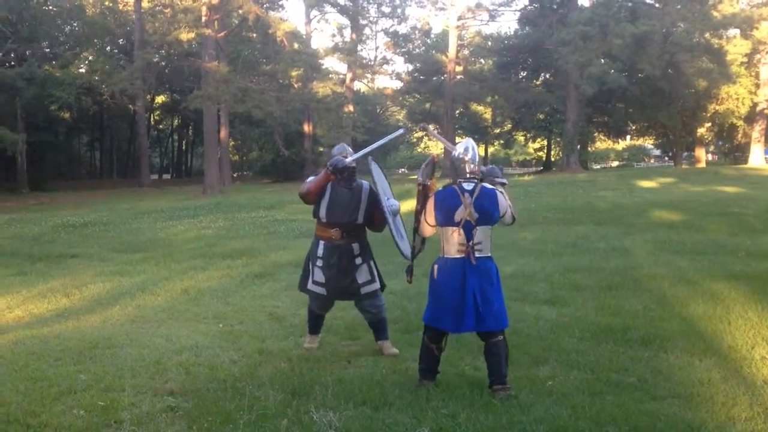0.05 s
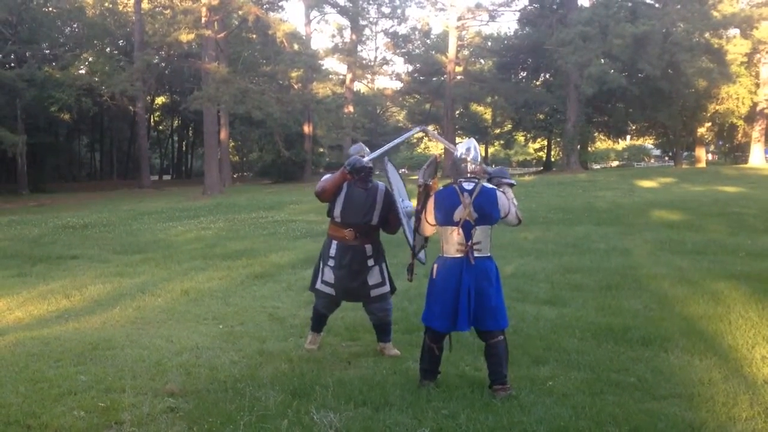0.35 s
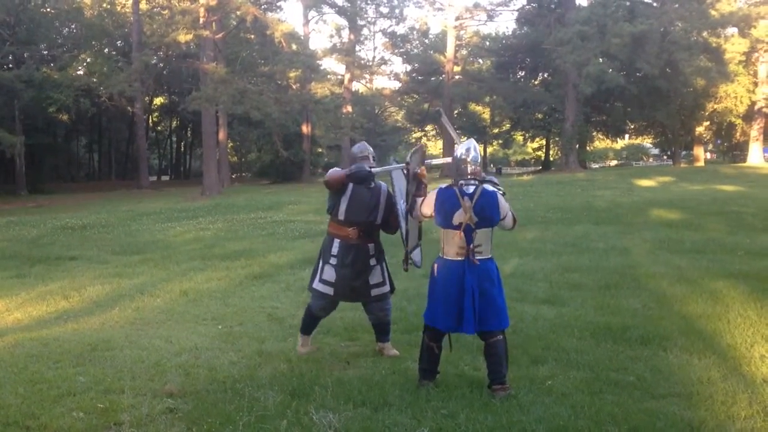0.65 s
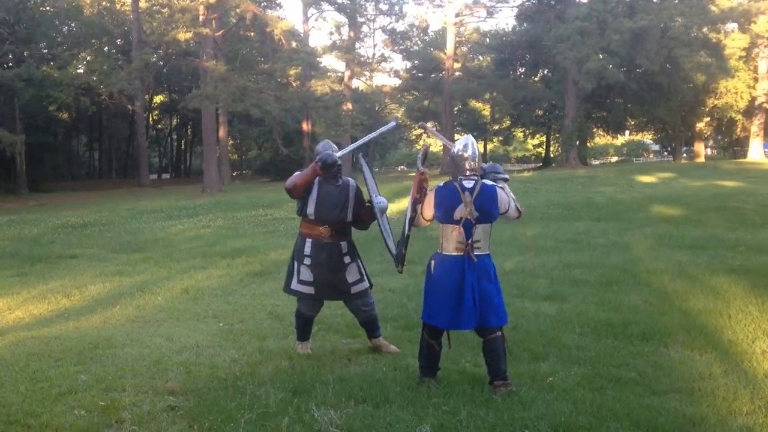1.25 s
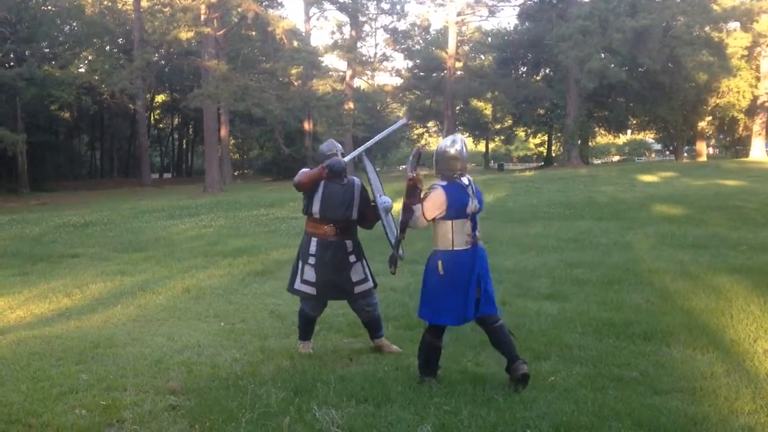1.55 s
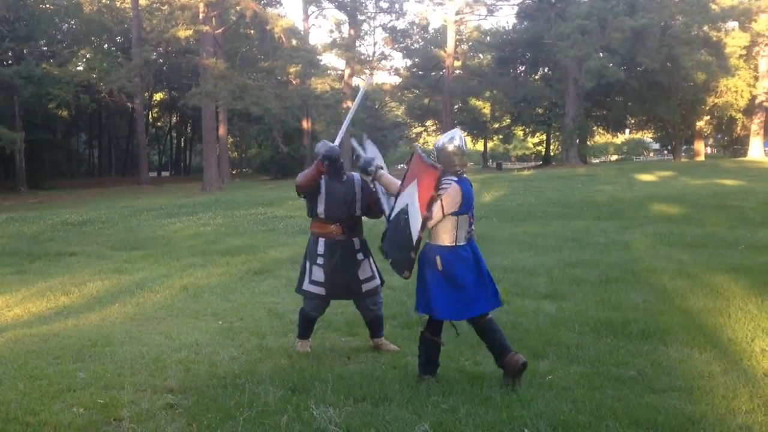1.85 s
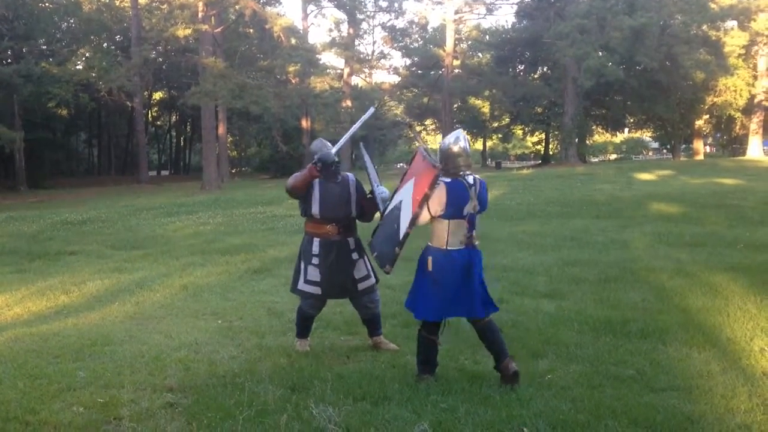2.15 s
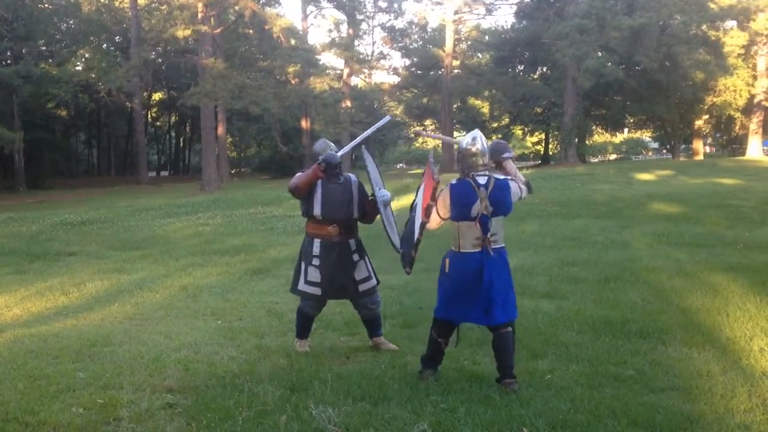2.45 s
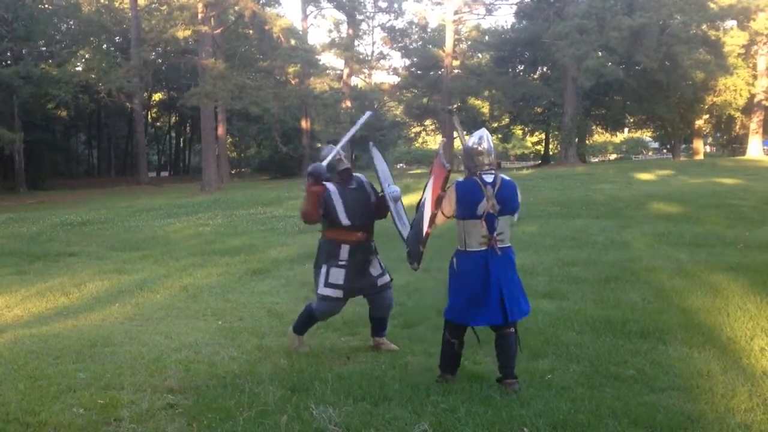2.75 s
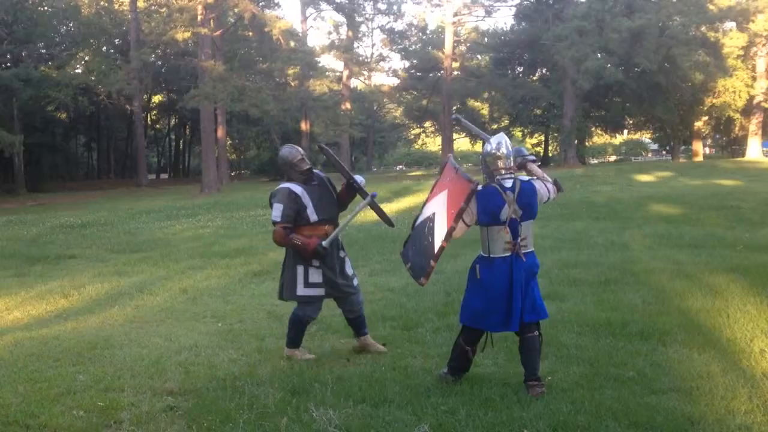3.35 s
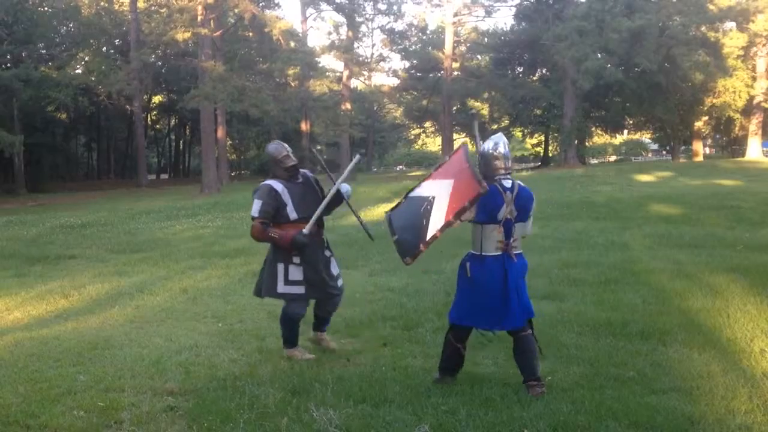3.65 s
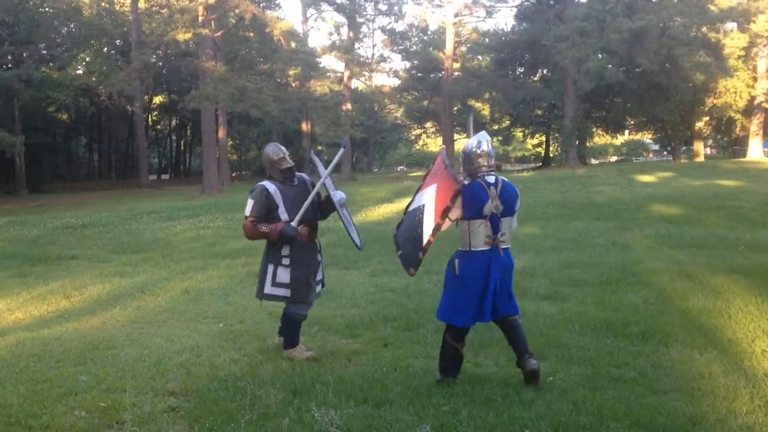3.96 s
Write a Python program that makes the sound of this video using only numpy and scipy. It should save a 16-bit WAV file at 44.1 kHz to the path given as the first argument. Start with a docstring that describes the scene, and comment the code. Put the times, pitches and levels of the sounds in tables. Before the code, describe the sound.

Practice swords land three sharp blows, on a shield at about 0.6 and 1.7 seconds and on armour at 3 seconds. Each crack rings very briefly and echoes off the trees. Softer knocks and clinks of gear follow at around 0.9, 1.9 and 3.3 seconds, with a slight rattle of mail. Faint songbirds whistle and chirp throughout over a quiet outdoor hush.

```python
"""On a lawn ringed by tall trees, two armoured fighters spar.
Three sword blows land on a shield's face, its edge and armour: each is a crack of noise plus the
short ring of the thing struck, and the tree line scatters it back. Gear knocks, plates clink and
mail rattles between the blows. Songbirds whistle gliding notes over a faint outdoor hush."""
import sys
import numpy as np
from scipy import signal
from scipy.fft import rfft, irfft
from scipy.io import wavfile
from scipy.ndimage import uniform_filter1d

SR = 44100
rng = np.random.default_rng(int(sys.argv[2]) if len(sys.argv) > 2 else 0)


def wrap_up_sound(samples):
    """Save the sound to the file named by the first command line argument, as 16-bit audio."""
    columns = np.atleast_2d(samples).T
    # keep every value between -1 and 1, then stretch to whole-number steps
    tamed = np.clip(columns, -1, 1)
    steps = np.round(tamed * 32767).astype(np.int16)
    wavfile.write(sys.argv[1], SR, steps)


N = 176400
TIME = np.arange(N) / SR
HIT_TIME = TIME[:SR // 5]  # the 0.2 s that one hit is given to die away

# Tone of the quiet outdoor air: pitch_hz, relative_db
HUSH_TONE = [(15, -58), (30, -40), (55, -20.5), (120, -5), (175, 1), (300, -7), (480, -14), (720, -9),
             (1200, -16.5), (2000, -23), (3000, -29), (5000, -34.5), (7200, -35), (10000, -41.5),
             (14000, -32), (15500, -39.5)]
# Slow rise and fall of the hush: time_s, change_db
HUSH_SWELL = [(0, 3), (1.3, 3), (2.3, -1), (3, 2.5), (4, -0.5)]
# Path of a thin, high whine: time_s, pitch_hz
WHINE_PITCH = [(0, 13470), (2.6, 13500), (3.45, 13500), (3.68, 13700), (4, 13500)]

# Clear bird whistles: start_s, length_s, start_hz, middle_hz, end_hz, level_db
BIRD_WHISTLES = [(.066, .048, 5750, 5250, 5030, -73), (0.195, 0.12, 3740, 2600, 2370, -55.5),
                 (0.31, 0.083, 2260, 2600, 2620, -56), (0.2, 0.13, 4050, 3670, 3650, -69.5),
                 (0.441, 0.17, 2400, 2105, 1850, -63.5), (0.508, 0.15, 3610, 2520, 2300, -55.5),
                 (0.68, 0.034, 2450, 2610, 2590, -54), (0.809, 0.077, 2660, 3010, 3250, -64),
                 (0.994, 0.059, 2200, 2384, 2420, -51.5), (1.219, 0.063, 2290, 2400, 2460, -48.5),
                 (1.225, 0.08, 2630, 3030, 3100, -67), (1.462, 0.06, 2170, 2325, 2370, -50.5),
                 (1.165, 0.033, 2080, 1840, 1510, -61), (1.592, 0.043, 2150, 1880, 1708, -63),
                 (2.432, .045, 2100, 1950, 1782, -67), (1.626, 0.21, 2490, 3070, 3180, -67.5),
                 (2.05, 0.11, 2550, 3000, 3107, -70), (2.485, 0.1, 2510, 3070, 3084, -67),
                 (2.73, 0.081, 2280, 2225, 2210, -58), (2.925, 0.087, 2240, 2166, 2190, -58.5),
                 (2.935, 0.071, 2560, 3035, 3180, -68.5)]
# Hoarse chirps of a second bird: start_s, length_s, start_hz, middle_hz, end_hz, level_db
BIRD_CHIRPS = [(2.656, 0.032, 2120, 2283, 2680, -58), (2.676, 0.046, 2415, 2300, 2270, -61),
               (2.843, 0.024, 2084, 2250, 2660, -52.5), (2.865, 0.02, 2250, 2360, 2500, -52),
               (3.852, 0.04, 1828, 2150, 2670, -64), (3.923, 0.03, 2710, 2296, 2150, -55),
               (3.943, 0.046, 2450, 2060, 1840, -55.5)]
# A bird call that falls in two steps: time_in_call_s, pitch_hz, relative_db
CALL_SHAPE = [(0, 3374, -17.5), (.009, 3406, 3), (.019, 3136, -1), (.028, 2737, 3), (.038, 2716, -4.5),
              (0.049, 2737, -8.5), (.063, 2270, 1.5), (0.077, 2040, -5.5), (.115, 2060, -11)]
# Each time that call is sung: start_s, pitch_ratio, level_db
CALL_REPEATS = [(.864, 1.03, -61.5), (1.099, 0.99, -58.5), (1.331, 1.01, -60.5)]

# How long the woods echo (a fade is the time to drop by 60 dB): pitch_hz, fade_s
ECHO_FADE = [(150, 0.83), (420, 0.82), (700, 1.22), (1200, 0.78), (2000, 1.23), (5000, 0.82), (8000, 0.5),
             (14000, 0.97)]
# Tone of that echo: pitch_hz, relative_db
ECHO_TONE = [(100, -7.5), (280, 5.5), (450, 2), (700, 2.5), (1200, -2), (2000, 0), (4000, -0.5),
             (5300, -1.5), (7000, 3.5), (14000, 4.5)]

# Tiny ticks of buckles: start_s, level_db
BUCKLE_TICKS = [(0.529, -59.5), (1.0225, -65), (2.2095, -62.5), (2.7525, -61.5), (3.0153, -58),
                (3.2985, -66), (3.410, -58)]
# Early echoes of two sword blows off a nearby trunk (at 0.688 and 1.767 s); the rest are gear knocks:
# start_s, thud_db, board_db, clack_db, clink_db, decay_s
KNOCKS_AND_ECHOES = [(0.688, -68, -41, -55, -54.5, 0.0023), (.904, -44.5, -39, -49.5, -63.5, 0.011),
                     (1.388, -60, -54.5, -49.5, -71, 0.021), (1.405, -73, -63, -49.5, -58, 0.0032),
                     (1.583, -62, -60, -61.5, -73.5, 0.024), (1.7014, -51, -39, -39.5, -48, 0.015),
                     (1.767, -56, -44, -39, -66, 0.0031), (1.907, -50, -47, -44, -66, 0.0058),
                     (1.965, -75, -61, -57, -67, 0.022), (3.013, -47, -52, -56, -71, 0.016),
                     (3.2971, -48, -43, -50, -53.5, 0.0033), (3.326, -45, -51, -54, -62.5, 0.007),
                     (3.409, -58.5, -50.5, -56, -68, 0.015), (3.458, -49.5, -52, -65, -80.5, 0.012),
                     (3.931, -66.5, -67, -59.5, -70.5, 0.006)]
# Pitch ranges of the thud, board, clack and clink: low_hz, high_hz
KNOCK_RANGES = [(150, 400), (650, 1160), (1300, 2630), (3600, 7800)]
# The ring in those two trunk echoes (at 0.688 and 1.766 s); the rest are bumps on the shield's edge:
# start_s, pitch_ratio, level_db
BUMPS_AND_ECHOES = [(.688, 1.14, -20.5), (1.766, 0.95, -24.5), (1.857, 1, -38), (1.892, 1.15, -28),
                    (1.906, .94, -17), (1.961, .99, -35), (2.059, 1.11, -35), (2.185, 1.06, -39)]

# Sword blows: start_s, ring_db, ring_rise_s, crack_db, crack_decay_s, tilt_db_per_octave, push_db,
# rebound_delay_s, rebound_db, echo_db, echo_ring_top_hz, echo_crack_boost_db
SWORD_BLOWS = [(.6470, -4.5, 0.0018, -17, 0.0052, -3.5, -79, .0055, -20, -19, 900, 5.5),
               (1.727, 1.83, 0.0026, -15, 0.0021, -1.5, -70, .0036, -29, -23, 1000, 12.5),
               (3.0284, 0.5, 0.0046, -14.5, 0.0066, -1.5, -28.5, .007, -17.5, -13, 560, 2.5)]
# Tone of a sword's crack, before each blow tilts it: pitch_hz, relative_db
CRACK_TONE = [(40, -47.5), (120, -33.5), (500, 0), (1200, 5.5), (2300, -2), (3300, -14), (5400, -10.5),
              (6400, -15.5), (7600, -10), (9200, -30), (11000, -24), (15500, -40)]
# Notes that ring in the shield's face: pitch_hz, relative_db, fade_s
FACE_NOTES = [(210, -18, 0.076), (282, -23, 0.1), (348.5, -16, 0.059), (570, -9.5, 0.033),
              (645.6, -4, 0.052), (801.4, -4, 0.032), (1005, 0.5, 0.03), (1352, -16.5, 0.034),
              (1653, -28, 0.047), (2304, -20.5, 0.043), (5780, -31, 0.036), (6930, -29.5, 0.029)]
# Notes that ring in the shield's edge: pitch_hz, relative_db, fade_s
EDGE_NOTES = [(663, 0.5, 0.03), (850, -6.5, 0.011), (1004, 2, 0.017), (1317, -14, 0.018),
              (1507, -14.5, 0.0078), (1650, -11, .022), (2030, -1, 0.017), (2476, -13.5, 0.012),
              (2925, -8.5, 0.014), (3450, -16.5, 0.012), (5330, -29, 0.018)]
# Notes that ring in the armour: pitch_hz, relative_db, fade_s
ARMOUR_NOTES = [(174, -9, 0.044), (266, -3, 0.035), (388, -8, 0.05), (606, -8.5, 0.031), (749, 12, 0.017),
                (909, -11, 0.056), (1025, -13.5, 0.054), (1496, -23, .04), (1624, -20, 0.03),
                (2110, -19.5, 0.055), (2315, -10, 0.0273), (3780, -31.5, 0.042), (5280, -28.5, 0.018),
                (7240, -12, 0.028), (7640, -29, 0.0093)]

# Small plates that ring when touched: start_s, pitch_hz, level_db, fade_s
PLATE_PINGS = [(0.906, 920, -31.5, 0.057), (0.91, 1130, -35.5, 0.05), (1.968, 3920, -60.5, 0.13),
               (3.239, 240, -40, 0.084), (3.298, 273.6, -35, 0.052), (3.298, 1940, -34.5, 0.02)]
# Mail and buckles shaken by a movement: start_s, end_s, level_db, low_hz, high_hz
MAIL_RATTLES = [(1.389, 1.447, -71, 6500, 12500), (1.699, 1.74, -62.5, 9040, 13600),
                (1.775, 1.845, -68.5, 10500, 12830), (3.041, 3.147, -58, 5500, 8200)]


def amp(db):
    """Turns decibels into a number to multiply by."""
    return 10 ** (np.asarray(db) / 20)


def unit(x):
    """Scales a sound to an average strength (rms) of 1."""
    return x / np.sqrt(np.mean(x ** 2) + 1e-20)


def look_up(points, hz):
    """Reads between a table's rows, with pitch spaced in octaves."""
    pitches, values = np.transpose(points)
    return np.interp(np.log(hz + 1), np.log(pitches + 1), values)


def add(mix, start_s, sound):
    """Mixes a sound in at a given time."""
    part = mix[round(start_s * SR):][:len(sound)]
    part += sound[:len(part)]


def filtered(x, hz, kind, order=2):
    """Keeps the "low" part, the "high" part or one "band" of a sound."""
    return signal.sosfilt(signal.butter(order, hz, kind, fs=SR, output="sos"), x)


def noise(tone, size):
    """Noise shaped by a table of pitches and levels."""
    gains = amp(look_up(tone, np.fft.rfftfreq(size, 1 / SR)))
    return unit(irfft(rfft(rng.standard_normal(size)) * gains, size))


def waver(rate_hz, size):
    """A random wobble, up to about the given rate."""
    return unit(filtered(rng.standard_normal(size), rate_hz, "low"))


def glide(hz):
    """A pure tone that follows a changing pitch."""
    return np.sin(2 * np.pi * np.cumsum(hz) / SR)


def hush(air_db=-61, whine_db=-81.5, wobble_hz=69.9):
    """Distant outdoor noise and a thin, wavering high whine."""
    air = amp(air_db + np.interp(TIME, *np.transpose(HUSH_SWELL))) * noise(HUSH_TONE, N)
    whine_hz = np.interp(TIME, *np.transpose(WHINE_PITCH)) + wobble_hz * waver(rate_hz=120, size=N)
    return air + amp(whine_db) * glide(whine_hz)


def birds(clear_wobble=0.0042, clear_rate_hz=160, hoarse_wobble=0.032, hoarse_rate_hz=300):
    """Whistles, hoarse chirps and a stepped call flicker through the leaves and echo in the woods."""
    out = np.zeros(N)
    voices = (BIRD_WHISTLES, clear_wobble, clear_rate_hz), (BIRD_CHIRPS, hoarse_wobble, hoarse_rate_hz)
    for notes, wobble, rate_hz in voices:
        for start_s, length_s, *pitches_hz, db in notes:
            progress = np.linspace(0, 1, round(length_s * SR))
            hz = np.polyval(np.polyfit([0, .5, 1], pitches_hz, 2), progress)  # curve through all three
            hz *= 1 + wobble * waver(rate_hz, len(hz))
            swell = abs(np.sin(np.pi * progress)) ** .9
            add(out, start_s, amp(db) * swell * glide(hz))
    call_s, call_hz, call_db = np.transpose(CALL_SHAPE)
    t = TIME[TIME < call_s[-1]]
    for start_s, ratio, db in CALL_REPEATS:
        hz = ratio * np.interp(t, call_s, call_hz)
        hz *= 1 + clear_wobble * waver(clear_rate_hz, len(t))
        add(out, start_s, amp(db + np.interp(t, call_s, call_db)) * glide(hz))
    out *= 1 + 0.26 * waver(rate_hz=55, size=N)  # flicker through the leaves
    return amp(1) * out + amp(-10) * woods(out)


def woods(sound, trees_s=0.089, trees_spread_s=0.0071, far_s=0.48, far_spread_s=0.047, patch_db=3):
    """A patchy echo builds up, slaps back from the tree line and swells again from farther trees."""
    size = 3 * SR // 2
    hz, slice_s, grid = signal.stft(rng.standard_normal(size), SR, nperseg=256)  # by pitch and time
    patches = uniform_filter1d(rng.standard_normal(grid.shape), size=12, axis=0)
    patches = unit(uniform_filter1d(patches, size=4, axis=1))
    faded_db = 60 * slice_s / look_up(ECHO_FADE, hz)[:, None]
    grid *= amp(patch_db * patches + look_up(ECHO_TONE, hz)[:, None] - faded_db)
    echo = signal.istft(grid, SR, nperseg=256)[1][:size]
    t = TIME[:size]
    build_up = np.interp(t, [0, trees_s / 2], [0, 1])  # nearer things answer first
    slap = 0.47 * np.exp(-((t - trees_s) / trees_spread_s) ** 2)
    far_swell = 0.88 * np.exp(-((t - far_s) / far_spread_s) ** 2)
    echo *= build_up + slap + far_swell
    return signal.fftconvolve(sound, echo / np.linalg.norm(echo))[:N]


def noise_band(low_hz, high_hz):
    """A short stretch of noise between two pitches."""
    hiss = filtered(rng.standard_normal(2 * len(HIT_TIME)), [low_hz, high_hz], "band", order=3)
    return unit(hiss[len(HIT_TIME):])


def burst(rise_s, decay_s):
    """The loudness of a hit: a quick rise, then a smooth fall, with a peak of 1."""
    shape = (1 - np.exp(-(HIT_TIME / rise_s) ** 2)) * np.exp(-HIT_TIME / decay_s)
    return shape / shape.max()


def ring(notes, rise_s, top_hz=np.inf):
    """A struck object rings with its own fading notes; those above top_hz are weakened."""
    waves = np.zeros(len(HIT_TIME))
    for k, (hz, db, fade_s) in enumerate(notes):
        loudness = amp(db - 60 * HIT_TIME / fade_s) / (1 + (hz / top_hz) ** 4)
        waves += (-1) ** k * loudness * np.sin(2 * np.pi * hz * HIT_TIME)  # every other note is flipped
    return waves * (1 - np.exp(-(HIT_TIME / rise_s) ** 2))


def gear_and_trunk_echoes():
    """Moving gear knocks, bumps and ticks; a nearby trunk echoes the first two blows 40 ms later."""
    out = np.zeros(N)
    for start_s, *levels_db, decay_s in KNOCKS_AND_ECHOES:
        bands = sum(amp(db) * noise_band(*edges) for db, edges in zip(levels_db, KNOCK_RANGES))
        add(out, start_s, bands * burst(0.23 * decay_s, decay_s))
    for start_s, ratio, db in BUMPS_AND_ECHOES:
        notes = [(ratio * hz, note_db, fade_s) for hz, note_db, fade_s in EDGE_NOTES]
        add(out, start_s, amp(db) * ring(notes, rise_s=0.0036, top_hz=810))
    for start_s, db in BUCKLE_TICKS:
        add(out, start_s, amp(db) * noise_band(3424, 14000) * burst(rise_s=0.00055, decay_s=0.002))
    return out + amp(-10.5) * woods(out)


def sword_blows(crack_rise_s=0.00034, push_s=0.0059, thump_delay_s=.078, thump_hz=(292, 342)):
    """Each blow cracks, rebounds, pushes the air and rings what it strikes; the trees send it back."""
    out = np.zeros(N)
    for blow, notes in zip(SWORD_BLOWS, (FACE_NOTES, EDGE_NOTES, ARMOUR_NOTES)):
        (start_s, ring_db, rise_s, crack_db, decay_s, tilt, push_db,
         rebound_delay_s, rebound_db, echo_db, echo_top_hz, echo_boost_db) = blow
        tone = [(hz, db + tilt * np.log2(hz / 500)) for hz, db in CRACK_TONE]
        snap = burst(crack_rise_s, decay_s)
        direct, rebound, *sideways = [noise(tone, len(HIT_TIME)) * snap for _ in range(5)]
        struck = amp(ring_db) * ring(notes, rise_s) + amp(crack_db) * direct
        add(struck, rebound_delay_s, amp(rebound_db) * rebound)
        struck = filtered(struck, hz=113, kind="high")  # ring and crack keep little deep bass; the push carries the low end
        push = amp(push_db) * np.sin(HIT_TIME / push_s) * np.exp(-HIT_TIME / (2 * push_s))
        add(out, start_s, struck + push)
        # The tree line throws a low thump back in one piece.
        add(out, start_s + thump_delay_s, amp(-10.5) * filtered(struck, thump_hz, "band"))
        # The crack differs in every direction, and the trees on each side return their share.
        dull_ring = amp(ring_db) * ring(notes, rise_s, echo_top_hz)
        for crack in sideways:
            outgoing = np.zeros(N)
            add(outgoing, start_s, dull_ring + amp(crack_db + echo_boost_db) * crack)
            out += amp(echo_db) * woods(outgoing) / np.sqrt(len(sideways))
    return out


def plates_and_mail(clicks_per_s=850):
    """Small plates ping with one note each; shaken mail rattles as its links click at random."""
    out = np.zeros(N)
    for start_s, hz, db, fade_s in PLATE_PINGS:
        add(out, start_s, ring([(hz, db, fade_s)], rise_s=0.00071))
    for start_s, end_s, db, low_hz, high_hz in MAIL_RATTLES:
        clicks = rng.standard_normal(len(HIT_TIME)) * (rng.random(len(HIT_TIME)) < clicks_per_s / SR)
        rattle = unit(filtered(clicks, [low_hz, high_hz], "band"))
        swell = np.sin(np.pi * np.minimum(HIT_TIME / (end_s - start_s), 1))
        add(out, start_s, amp(db) * rattle * swell)
    return out + amp(-17) * woods(out)


def scene():
    """The fight, the birds and the hush, together in one channel."""
    return (sword_blows() + gear_and_trunk_echoes() + plates_and_mail() + birds() + hush())[None]


def record(dry, ceiling=0.91, top_hz=15600):
    """Rounds off the loudest peaks, then cuts the very highest treble."""
    rounded = ceiling * np.tanh(dry / ceiling)
    treble_cut = signal.firwin(511, top_hz, window=("kaiser", 9), fs=SR)
    return signal.oaconvolve(rounded, treble_cut[None], "same")


dry = scene()
out = record(dry)
wrap_up_sound(out)
```